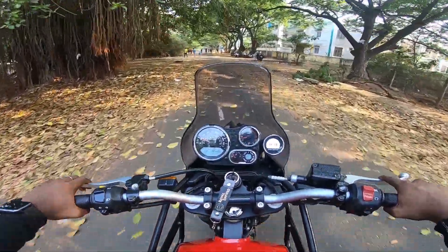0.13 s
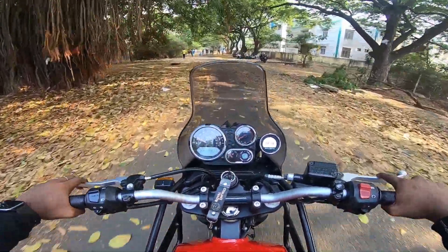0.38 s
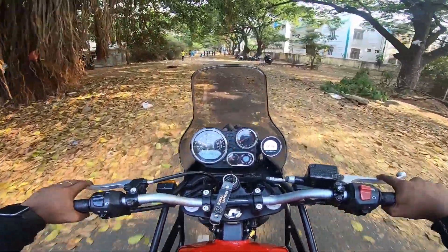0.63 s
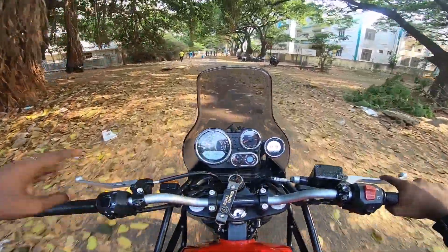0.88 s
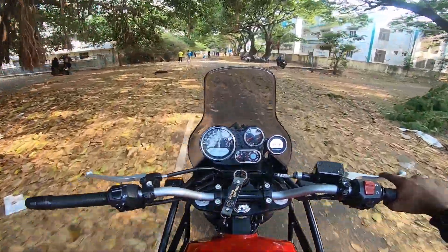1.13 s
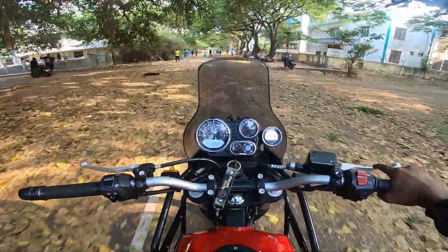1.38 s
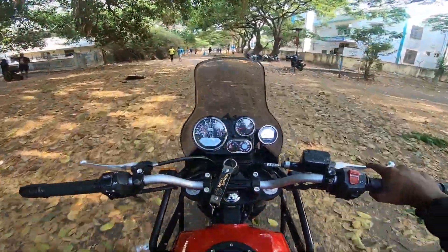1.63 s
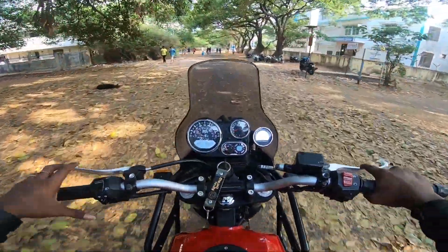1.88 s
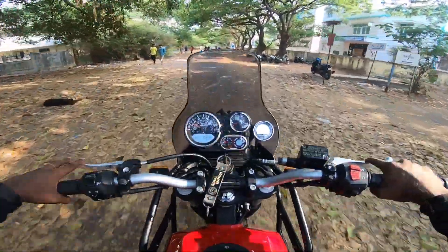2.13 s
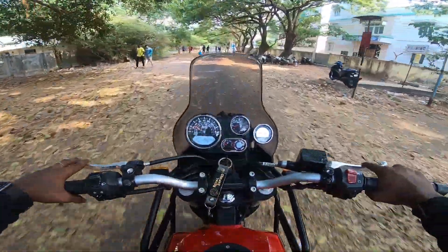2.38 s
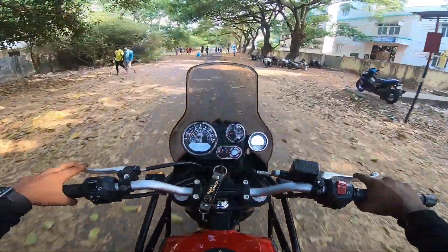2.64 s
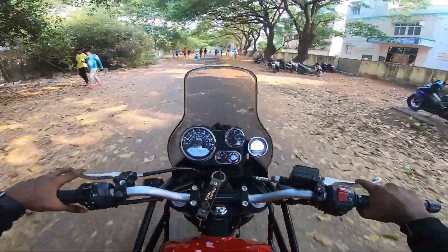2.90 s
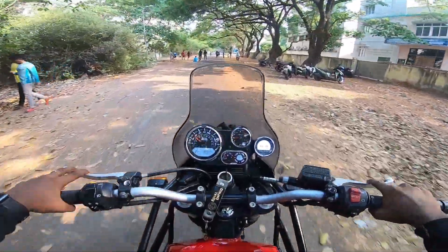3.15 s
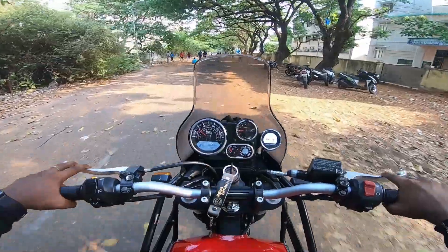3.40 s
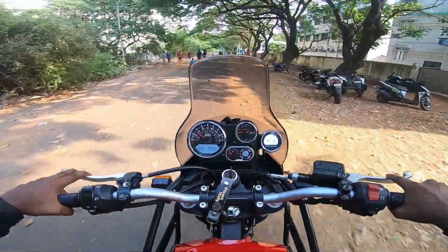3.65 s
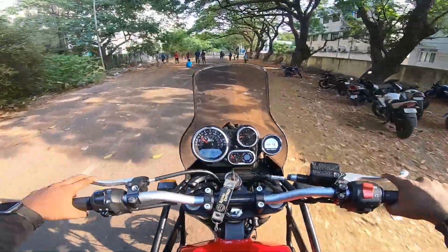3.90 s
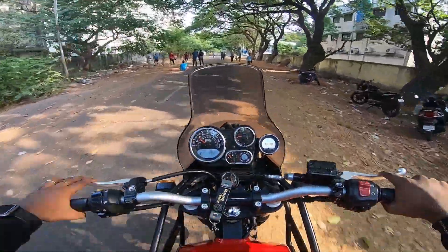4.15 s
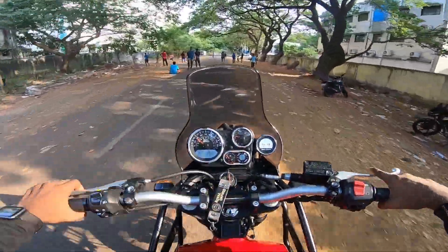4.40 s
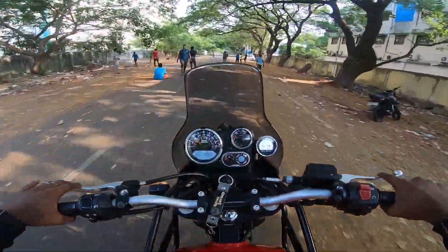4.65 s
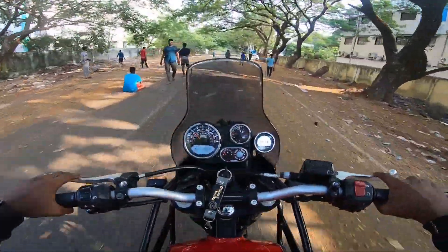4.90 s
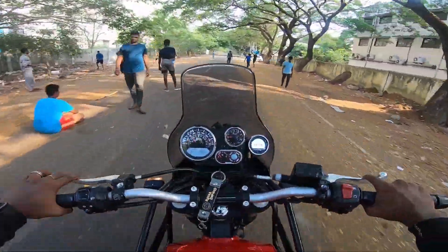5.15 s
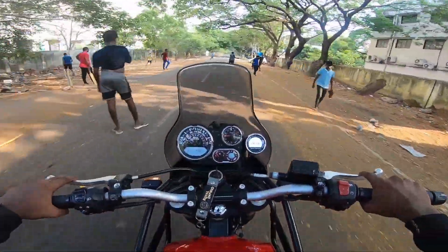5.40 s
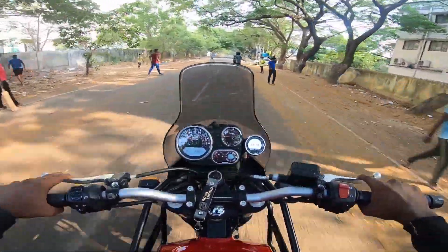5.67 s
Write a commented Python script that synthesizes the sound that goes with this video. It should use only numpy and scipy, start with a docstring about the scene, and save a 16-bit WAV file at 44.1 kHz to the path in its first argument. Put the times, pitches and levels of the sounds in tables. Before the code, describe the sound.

From a rider's helmet, slow engine thuds quicken and grow louder; a hard visor clack dips everything, and later the engine drops one gear-change step in pitch.

```python
"""On the helmet of a motorcycle rider: the single-cylinder bike pulls away and shifts up a gear.
Soft pressure spikes ring the exhaust pipe; intake gulps and a ringing air box beat with each cycle.
Shaped noise makes engine clatter and wind; the visor snaps shut as scrapes, dying cosines and
a swing of pressure, and the gain control ducks everything for half a second."""
import sys
import numpy as np
from scipy import signal
from scipy.io import wavfile
from scipy.ndimage import uniform_filter1d

SR = 44100
rng = np.random.default_rng(int(sys.argv[2]) if len(sys.argv) > 2 else 0)


def nominal_scale(level):
    """Amplitude ratio for a level in decibels (scalar or array-like)."""
    x = np.asarray(level, float) / 20
    return 10 ** x


def put_to_file(sound):
    """Save the sound as 16-bit audio at rate SR, in the file named by the first command-line argument."""
    columns = np.atleast_2d(sound).T  # one column per channel
    safe = np.clip(columns, -1, 1)
    whole_steps = np.round(safe * 32767)
    wavfile.write(sys.argv[1], SR, whole_steps.astype(np.int16))


N = 255327
t = np.arange(N) / SR


def evened(x):
    """Scales to rms 1."""
    return x / np.sqrt(np.mean(x ** 2) + 1e-20)


def curve(rows):
    """The second column of a table, drawn in straight lines over the seconds of the first."""
    seconds, values = np.transpose(rows)
    return np.interp(t, seconds, values)


def noise(points, patchy_db):
    """Random short-time spectra of a given colour, with drifting patches."""
    hz = np.fft.rfftfreq(2048, 1 / SR)
    point_hz, point_db = np.transpose(points)
    real, imaginary, patches = rng.standard_normal((N // 512 + 5, 1025, 3)).T
    patches = uniform_filter1d(patches, size=20, axis=0)  # across frequency
    patches = evened(uniform_filter1d(patches, size=6, axis=1))  # across time
    colour_db = np.interp(np.log(hz + 1), np.log(point_hz + 1), point_db)
    spectra = (real + 1j * imaginary) * nominal_scale(colour_db[:, None] + patchy_db * patches)
    return evened(signal.istft(spectra, nperseg=2048, noverlap=1536)[1][:N])


def resonate(x, hz, width, passes=1):
    """A resonance of gain 1; further passes make it steeper and narrower."""
    for _ in range(passes):
        x = signal.lfilter(*signal.iirpeak(hz, hz / width, SR), x)
    return x


def ring(modes, rise, tilt_db=0):
    """Dying cosines with a soft start of rise seconds, tilted in dB per octave around 4 kHz."""
    u = np.arange(6000) / SR
    out = np.zeros(len(u))
    for hz, db, t60 in modes:
        steepness = 3 if hz > 4000 else 1  # the treble tilts three times as steeply
        mode_db = db + tilt_db * np.log2(hz / 4000) * steepness
        out += nominal_scale(mode_db - 60 * u / t60) * np.cos(2 * np.pi * hz * (u - rise))
    return out * np.sin(np.pi / 2 * np.minimum(u / rise, 1)) ** 2


def add(mix, s, sound):
    """Mixes a sound in at s seconds."""
    part = mix[round(s * SR):][:len(sound)]
    part += sound[:len(part)]


def train(cycles, spread_db):
    """One impulse of uneven size each time the cycle count reaches a whole number."""
    whole = np.floor(cycles).astype(int)
    size = nominal_scale(spread_db * rng.standard_normal(200))
    return np.diff(whole, prepend=whole[0]) * size[whole + 2]


def spikes(beats, width):
    """Turns impulses into smooth bell-shaped spikes of the same height; width is in seconds."""
    u = np.arange(-200, 201) / SR
    return signal.oaconvolve(beats, np.exp(-.5 * (u / width) ** 2), "same")


def decay(x, s):
    """Lets every impulse die away exponentially, with a time constant of s seconds."""
    return signal.lfilter([1], [1, -np.exp(-1 / (s * SR))], x)


# Engine speed. Each row: time in seconds, firings per second.
FIRING_RATE = [(0.0, 17.16), (0.3, 17.24), (0.5, 17.45), (1.0, 18.575), (1.5, 19.625), (2.0, 20.761),
               (2.5, 22.065), (3.0, 23.723), (3.5, 25.35), (4.0, 27.221), (4.5, 29.351), (4.64, 27.923),
               (4.72, 23.893), (4.8, 23.021), (5.2, 24.265), (5.5, 25.096), (5.8, 25.747)]


def speed():
    """Firings per second at every sample; a four-stroke cycle fires once."""
    return curve(FIRING_RATE)


# Throttle, as the strength of the blows that ring the pipe; it shuts for the gear change.
# Each row: time in seconds, level in dB.
THROTTLE_OPENING = [(0, -28), (.9, -27.5), (1.4, -26), (2.2, -23), (2.8, -21), (3.5, -17), (4.2, -14.5),
                    (4.47, -14.5), (4.51, -30), (4.62, -29), (4.72, -21), (5.1, -17), (5.8, -14.5)]


def throttle():
    """Throttle opening in dB at every sample: more charge makes a harder blow."""
    return curve(THROTTLE_OPENING)


def effort(db, db_per_hz, per_throttle):
    """A level in dB that follows engine speed and throttle; db holds at 18 firings/s and throttle -20 dB."""
    return db + db_per_hz * (speed() - 18) + per_throttle * (throttle() + 20)


def pipe(beats, modes, width):
    """Modes of a duct, struck by soft spikes; they ring higher as speed rises and the gas heats."""
    faster = speed() / 25 - 1  # the modes are tuned at 25 firings per second
    drive = spikes(beats, width) / (width * SR * np.sqrt(2 * np.pi))
    out = 0
    for hz, db, t60, share in modes:
        carrier = np.exp(2j * np.pi * np.cumsum(hz * (1 + share * faster)) / SR)
        envelope = signal.lfilter([1], [1, -nominal_scale(-60 / (t60 * SR))], drive / carrier)
        out = out + nominal_scale(db) * (carrier * envelope).real
    return out


def shake(cycles, heard):
    """The crank turns twice a cycle and shakes the frame; one slow push a cycle joins it."""
    crank = nominal_scale(-30) * np.cos(4 * np.pi * (cycles - .42))
    push = nominal_scale(-38) * np.cos(2 * np.pi * (heard - .62))
    return crank + push


def gulp(heard):
    """The intake stroke sucks a rounded dip into the pressure, .29 of a cycle long, after each pop."""
    stroke = np.clip(((heard - .02) % 1) / .29, 0, 1)
    return -nominal_scale(-14) * np.sin(np.pi * stroke) ** .7


# Ring of the air box. Each row: pitch in Hz at 25 firings per second, level in dB,
# 60 dB decay time in seconds, share of a relative speed change that the pitch follows.
AIRBOX_MODES = [(109, 0.1, .07, .18), (284, -24, .031, .01)]
SHUT_CYCLE = .355  # end of the intake stroke, in cycles after the pop


def airbox(heard):
    """The closing intake sets the box swinging; it booms most behind a shut throttle, over a faint hum."""
    hz = AIRBOX_MODES[0][0]
    # behind a shut throttle an extra blow starts the swing one nominal period early
    early = train(np.interp(t + 1 / hz, t, heard) - SHUT_CYCLE, spread_db=1.2)
    early = early * nominal_scale(effort(-11, 0, per_throttle=-1.1))
    blows = train(heard - SHUT_CYCLE, spread_db=1.2) + early
    boom = pipe(blows, AIRBOX_MODES, .0012)
    hum = evened(resonate(rng.standard_normal(N), hz, 30, passes=2))
    return nominal_scale(effort(-16.5, db_per_hz=.4, per_throttle=-.4)) * (boom + nominal_scale(-27) * hum)


# Resonances of tank and helmet shell that the clatter sings in.
# Each row: centre in Hz, width in Hz, level in dB.
SHELL_MODES = [(559, 67, -13.5), (680.4, 29, -9.5), (809.3, 74, 5), (944.5, 26.7, 1), (1146.4, 59, -5.5),
               (1296, 14.3, -13), (1534, 88, -13.5), (2115, 260, -19)]
# Broad colour of the clatter. Each row: frequency in Hz, relative level in dB per Hz.
CLATTER_COLOUR = [(60, -6), (200, -7), (300, -7.5), (450, -14.5), (700, -15.5), (1100, -21.5),
                  (1900, -27.5), (3500, -28.5), (4000, -40.5), (6200, -42), (7200, -47.5), (10500, -53),
                  (12500, -60), (16000, -80)]
CLATTER_DB, CLATTER_PER_THROTTLE = -26.5, 0.11  # base level; dB per dB of throttle


def clatter(cycles):
    """Valve gear, chain and tyres: noise that beats with the cycle and sings in the shell."""
    beat_db = 0.49 * np.cos(2 * np.pi * (cycles - .05)) + 0.41 * np.cos(4 * np.pi * (cycles - .2))
    lumps_db = 0.72 * evened(uniform_filter1d(rng.standard_normal(N), size=900))
    drive = rng.standard_normal(N) * nominal_scale(beat_db + lumps_db)
    sung = np.zeros(N)
    for hz, width, db in SHELL_MODES:
        # each pass is wider than the row says, as two passes narrow it again
        sung += nominal_scale(db) * evened(resonate(drive, hz, 1.48 * width, passes=2))
    road_db = 0.68 * t  # tyre and air hiss grows as the bike gains pace
    broad = noise(CLATTER_COLOUR, patchy_db=1.0) * nominal_scale(2.2 * beat_db + lumps_db + road_db)
    level_db = effort(CLATTER_DB, 0.3151, CLATTER_PER_THROTTLE)
    # the broad part grows faster than the shell tones as the engine works harder
    broad_db = -4.5 + 0.031 * (level_db + 15.5)
    return nominal_scale(level_db) * (evened(sung) + nominal_scale(broad_db) * broad)


# Ring of fins and covers under the valve gear. Each row: centre in Hz, width in Hz, level in dB.
FIN_MODES = [(2214, 105, 7.5), (2790, 450, -20), (3350, 150, -2.5), (4260, 620, -0.5), (5120, 67, -10),
             (5960, 60, -17.5), (8460, 300, -18), (9900, 300, -24.5), (12400, 900, -27)]
# Taps of the valve gear. Each row: place in the cycle from 0 to 1, level in dB.
VALVE_TAPS = [(.1, 0), (.4, -4), (.64, -6), (.87, -3)]


def ticks(cycles):
    """Valves seat twice a cycle in faint short treble hisses; taps of the gear also ring the fins."""
    taps = sum(nominal_scale(db) * train(cycles - place, spread_db=3) for place, db in VALVE_TAPS)
    jolts = (0.035 + decay(taps, 0.0061)) * rng.standard_normal(N)
    fins = evened(sum(nominal_scale(db) * evened(resonate(jolts, hz, width)) for hz, width, db in FIN_MODES))
    fins_db = effort(CLATTER_DB - 25, 0.24, CLATTER_PER_THROTTLE)
    seats = train(cycles - .12, spread_db=2) + .45 * train(cycles - .42, spread_db=3)
    hisses = decay(seats, 0.004) * rng.standard_normal(N)
    return nominal_scale(-63.5) * resonate(hisses, 8300, 9000, passes=2) + nominal_scale(fins_db) * fins


# Ring of the exhaust pipe. Each row: pitch in Hz at 25 firings per second, level in dB,
# 60 dB decay time in seconds, share of a relative speed change that the pitch follows.
PIPE_MODES = [(275.3, 5, 0.069, 0.28), (331.3, 7, 0.088, 0.32)]
# Dips in the exhaust tone. Each row: centre in Hz, width in Hz, depth from 0 to 1.
EXHAUST_DIPS = [(174, 99, 0.46), (452, 82, 0.33)]
POP_S, PUFF_S = .00066, .00065  # spread of the bell-shaped spikes


def exhaust(heard, fire, beats):
    """Each firing pops, then puffs, louder than the pop at low speed and fading as speed rises."""
    # the puff follows by part of a cycle plus its way back up the pipe
    puffs = train(np.interp(t - .0036, t, heard) - .1, spread_db=1.5)
    puffs = puffs * nominal_scale(effort(-13, db_per_hz=-.6, per_throttle=0))
    pops = spikes(fire * nominal_scale(effort(-15.5, 0, per_throttle=.3)), POP_S) + spikes(puffs, PUFF_S)
    # both also ring the pipe
    out = pops + pipe(beats + nominal_scale(-16.5) * puffs, PIPE_MODES, POP_S)
    for hz, width, depth in EXHAUST_DIPS:
        out = out - depth * resonate(out, hz, width)
    return out


def knock(beats):
    """Every firing also knocks on tank and helmet shell; narrow modes ring longest."""
    modes = [(hz, db, 5.4 / width) for hz, width, db in SHELL_MODES]
    return signal.oaconvolve(beats, ring(modes, rise=0.0007))[:N]


def engine():
    """One running count of cycles times every pop, gulp, boom, knock, tap and shake."""
    cycles = .134 + np.cumsum(speed()) / SR
    # sound takes 3.3 ms from engine to helmet; the shifted count is whole at each pop
    heard = np.interp(t - .0033, t, cycles) + .11
    fire = train(heard, spread_db=.7)
    beats = fire * nominal_scale(throttle())
    breath = exhaust(heard, fire, beats) + gulp(heard)
    breath = breath - breath.mean()
    mechanics = shake(cycles, heard) + clatter(cycles) + ticks(cycles)
    return mechanics + airbox(heard) + breath + nominal_scale(-12.5) * knock(beats)


# Colour of the wind. Each row: frequency in Hz, relative level in dB per Hz.
WIND_COLOUR = [(3, -4), (9, 0), (20, -4), (44, -13), (80, -18), (170, -29), (300, -41), (600, -60),
               (3000, -110)]


def wind():
    """Low lumpy buffeting on the microphone."""
    gusts_db = 1.46 * evened(uniform_filter1d(rng.standard_normal(N), size=5000))
    return nominal_scale(-18.5) * evened(noise(WIND_COLOUR, patchy_db=-3.2) * nominal_scale(gusts_db))


def noise_burst(length, db, hz, width):
    """Band-passed noise with rounded ends, at most 68 ms long."""
    edges = [hz - width / 2, hz + width / 2]
    band = signal.butter(3, edges, "bandpass", fs=SR, output="sos")
    settled = signal.sosfilt(band, rng.standard_normal(4000))[1000:]
    burst = evened(settled)[:round(length * SR)]
    return nominal_scale(db) * burst * signal.windows.tukey(len(burst), .4)


# Glove and lever scuffs, two high chirps layered in three bands, and a squeak.
# Each row: start in seconds, length in seconds, level in dB, centre in Hz, width in Hz.
SCUFFS_AND_CHIRPS = [(0.812, 0.013, -37, 4030, 5100), (2.862, .016, -55, 10000, 600),
                     (2.914, .016, -55, 10000, 600), (2.862, .016, -64, 13100, 900),
                     (2.914, .016, -64, 13100, 900), (2.862, .014, -59, 7600, 700),
                     (4.565, 0.041, -47, 4370, 6900), (4.67, 0.026, -46.5, 4560, 6960),
                     (4.7, 0.04, -38, 1550, 260)]


def scuffs_and_chirps():
    """Short noise bursts: broad bands scuff, narrow ones chirp or squeak."""
    out = np.zeros(N)
    for s, length, db, hz, width in SCUFFS_AND_CHIRPS:
        add(out, s, noise_burst(length, db, hz, width))
    return out


# The visor along its ratchet. Each row: start in seconds, length in seconds (68 ms at most), level in dB.
RATCHET_SCRAPES = [(1.312, 0.0056, -29.5), (1.351, 0.006, -26.5), (1.466, 0.015, -24.5),
                   (1.541, 0.0116, -26), (1.562, 0.014, -35), (1.52, 0.08, -36.5), (1.581, 0.0205, -30.5),
                   (1.603, 0.0089, -13), (1.608, 0.0066, -10.5)]


def scrapes():
    """The visor scrapes along its ratchet, always in the same noise band."""
    out = np.zeros(N)
    for s, length, db in RATCHET_SCRAPES:
        add(out, s, noise_burst(length, db, hz=1940, width=1630))
    return out


# Ring of the visor. Each row: pitch in Hz, level in dB, 60 dB decay time in seconds.
VISOR_MODES = [(277, -10, 0.023), (532, -13, 0.019), (1260, -12, 0.0075), (1990, -20, 0.024),
               (3420, -29, 0.0032), (4340, 5, 0.0016), (7070, -1.5, 0.002), (9540, -19.5, 0.006),
               (13000, -52, 0.002)]
# Clicks of the visor. Each row: start in seconds, level in dB, contact time in seconds.
VISOR_CLICKS = [(1.3545, -31, .0004), (1.4755, -16, .0002), (1.5425, -18, .0007), (1.5655, -14, .0007),
                (1.5885, -16, .0007), (1.977, -28, .0001), (1.6012, -24, .0001), (1.6045, -11, .0007),
                (1.6084, 6, .0001), (1.6107, -3, .0003), (1.6122, -8, .0004), (1.6173, 9, .0001),
                (1.6251, -13, .0002), (1.629, -9, .0003), (1.634, -14, .0004)]


def clicks():
    """Ratchet clicks and the final snap ring the visor; a longer contact sounds duller."""
    out = np.zeros(N)
    for s, db, contact in VISOR_CLICKS:
        # 2 dB per octave of tilt for each doubling of the hardest contact, down to -4
        tilt_db = max(-2 * np.log2(contact / .0001), -4)
        add(out, s, nominal_scale(db) * ring(VISOR_MODES, rise=contact, tilt_db=tilt_db))
    return out


def squeeze():
    """Air under the visor: pressed up as it closes, let go as it seats, then swinging out."""
    seat_s, press_s, swing_t60 = 1.6053, .016, .027
    u = np.arange(-press_s, swing_t60, 1 / SR)  # seconds from seating
    press = nominal_scale(-2.5) * (1 + u / press_s) * np.clip(-u / .001, 0, 1)
    swing = nominal_scale(6 - 60 * u / swing_t60) * np.sin(2 * np.pi * 110 * u) * (u >= 0)
    out = np.zeros(N)
    add(out, seat_s - press_s, press - swing)
    return out


def scene():
    """Everything reaches one microphone."""
    visor = scrapes() + clicks() + squeeze()
    return (engine() + wind() + scuffs_and_chirps() + visor)[None]


def roll_off(x):
    """The treble ends steeply here."""
    return signal.sosfilt(signal.butter(12, 15720, fs=SR, output="sos"), x)


def record(dry):
    """An overload pulls the gain down within some ms; it creeps back; what passes first is clipped."""
    loudness_db = 20 * np.log10(uniform_filter1d(abs(dry[0]), size=60) + 1e-9)
    fall_db = t * 19.0  # the held loudness sinks by 19 dB a second
    held_db = np.maximum.accumulate(loudness_db + fall_db) - fall_db
    over_db = np.maximum(held_db + 5.5, 0)
    lag = np.exp(-1 / (.011 * SR))  # 11 ms
    duck_db = signal.lfilter([1 - lag], [1, -lag], 1.18 * over_db)
    finished = np.clip((dry - dry.mean()) / nominal_scale(duck_db), -.98, .98)
    return roll_off(finished)


dry = scene()
out = record(dry)
put_to_file(out)
```